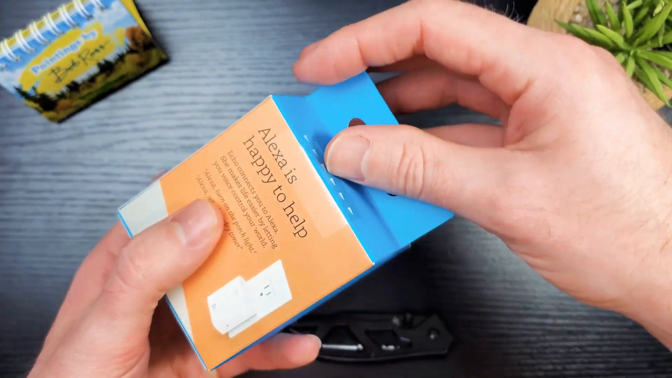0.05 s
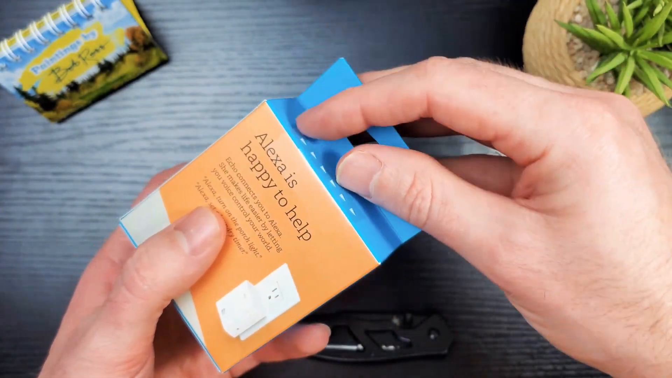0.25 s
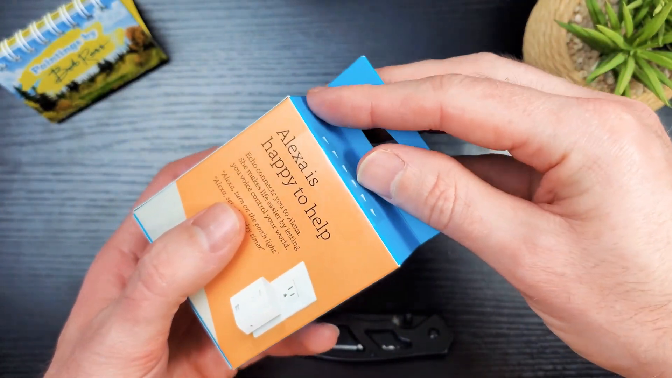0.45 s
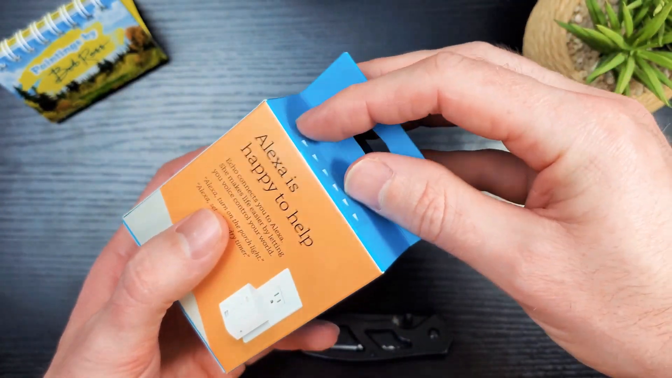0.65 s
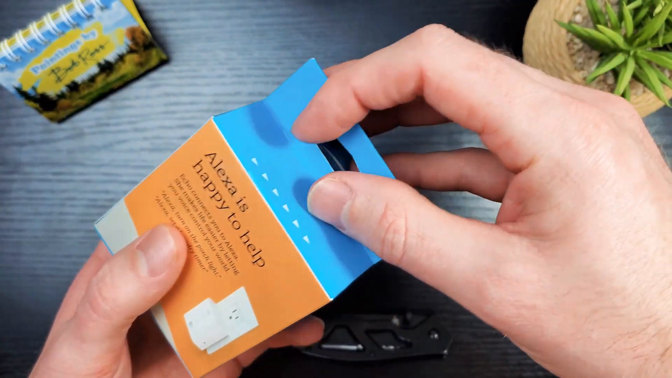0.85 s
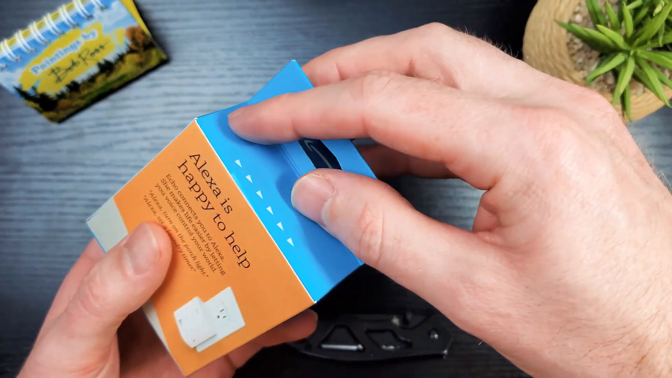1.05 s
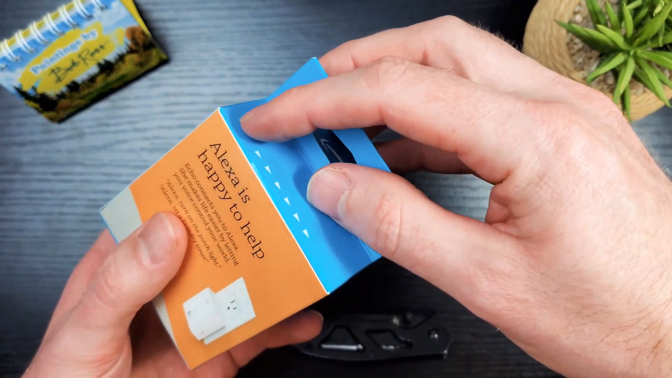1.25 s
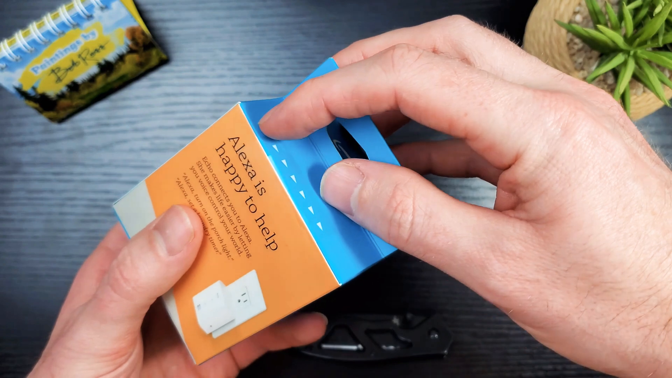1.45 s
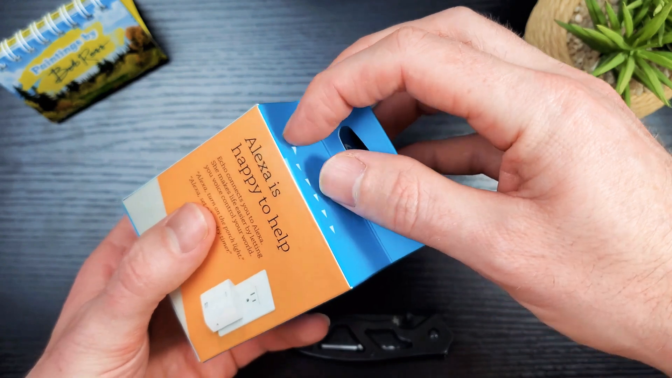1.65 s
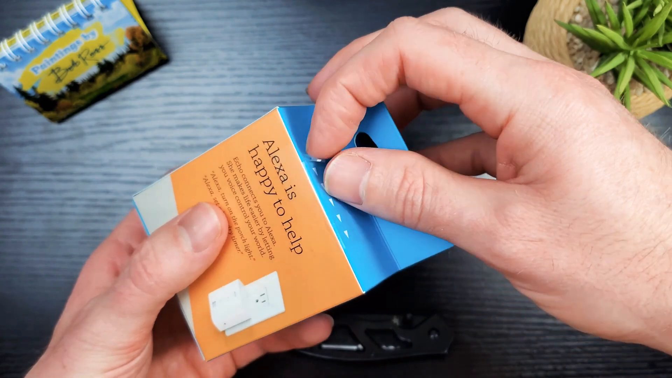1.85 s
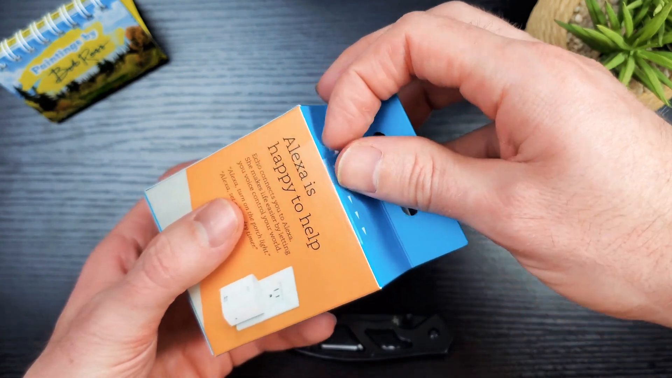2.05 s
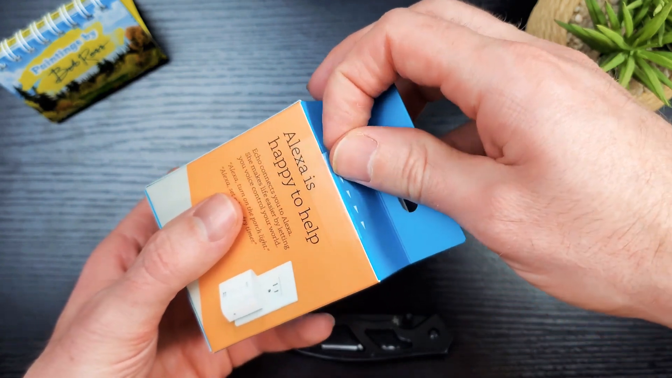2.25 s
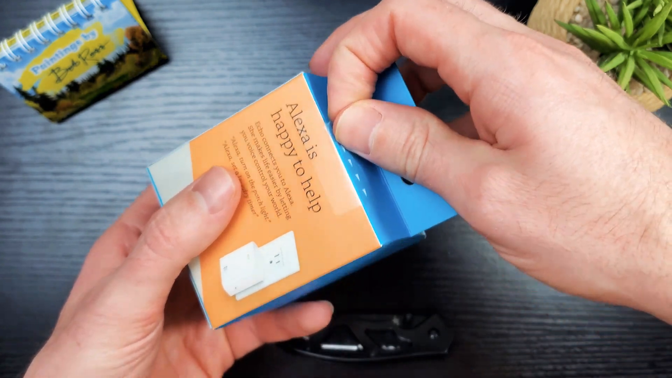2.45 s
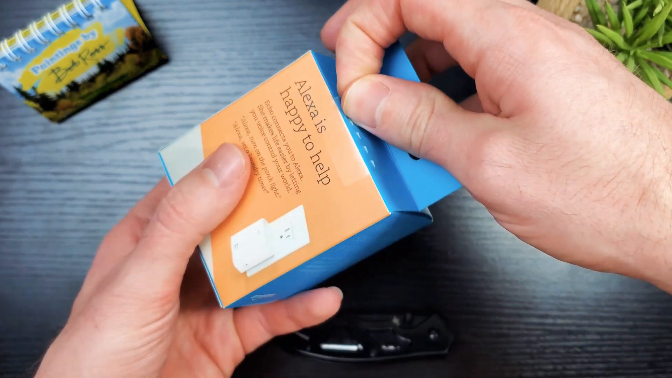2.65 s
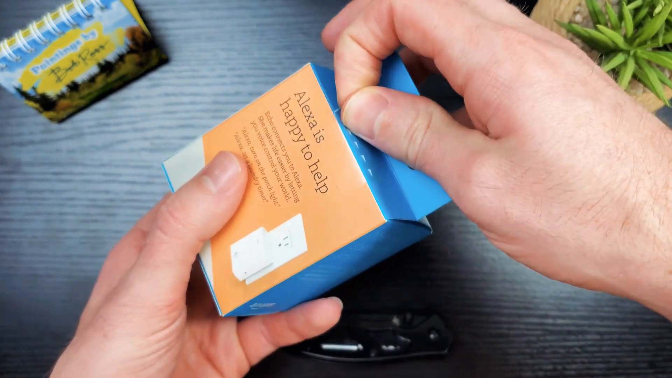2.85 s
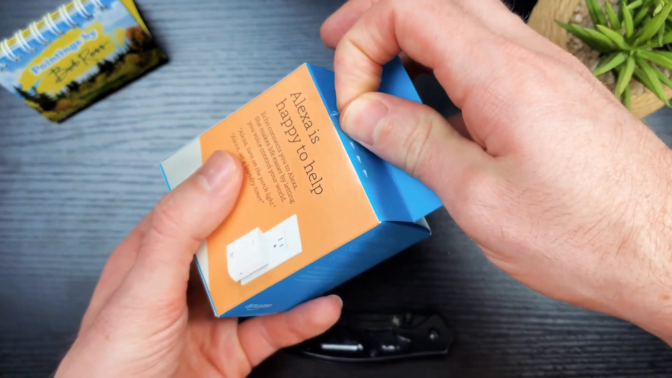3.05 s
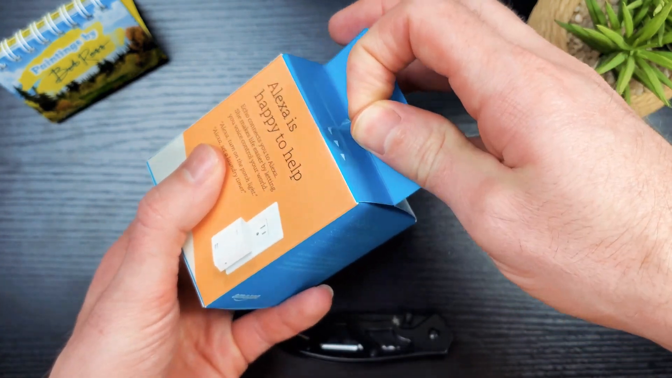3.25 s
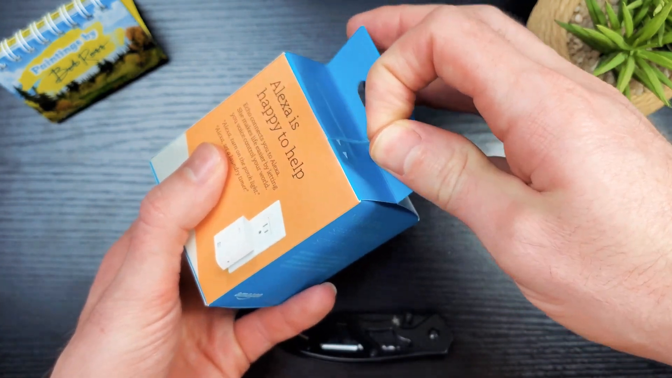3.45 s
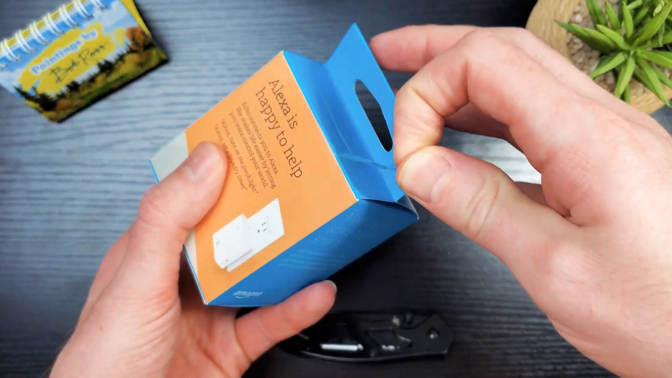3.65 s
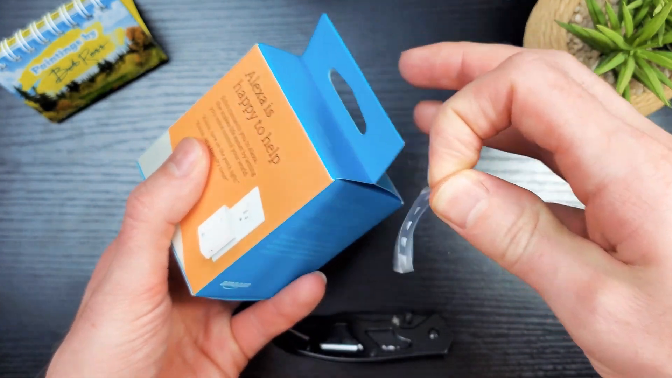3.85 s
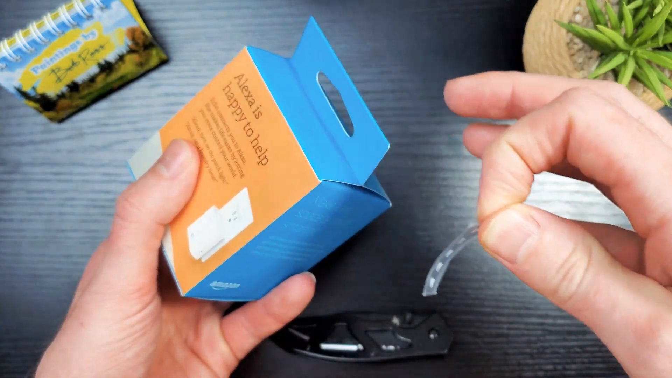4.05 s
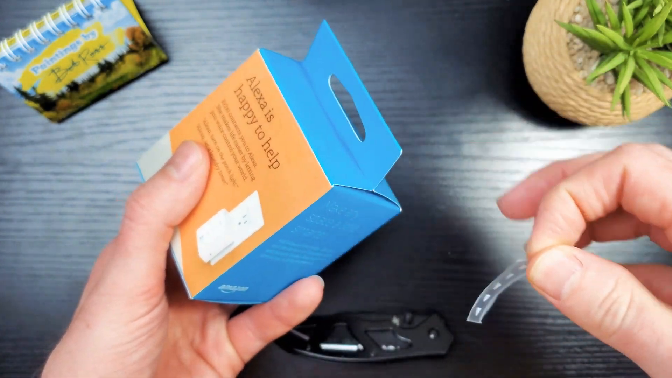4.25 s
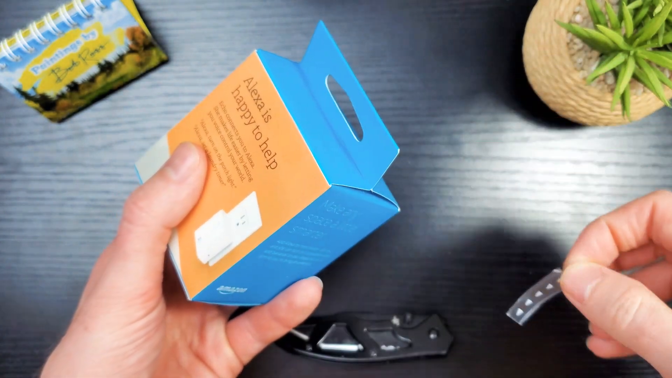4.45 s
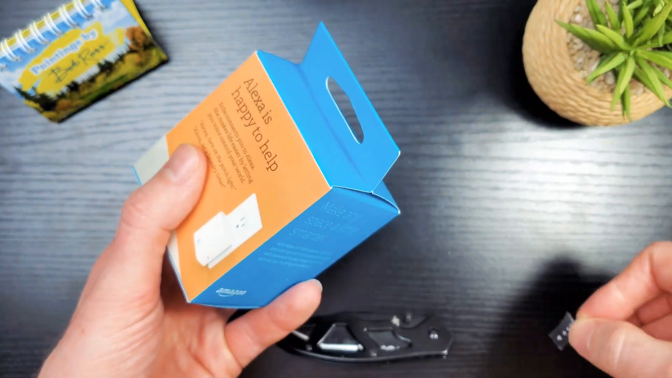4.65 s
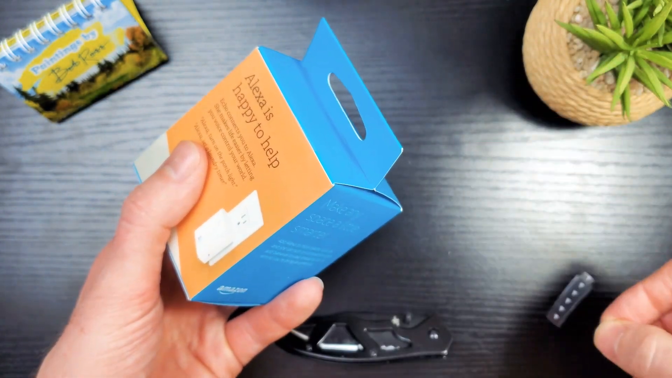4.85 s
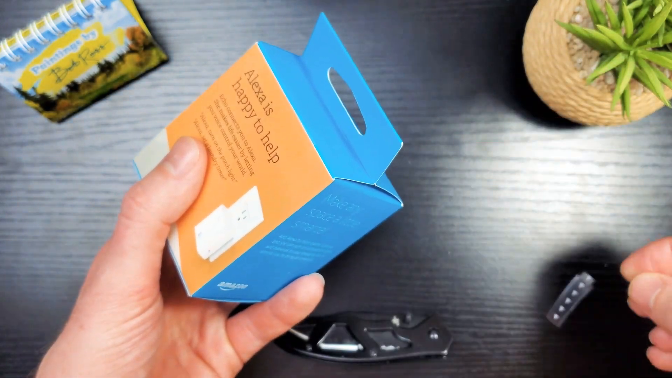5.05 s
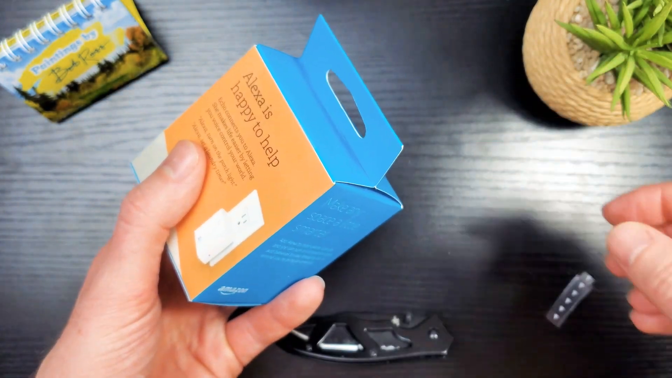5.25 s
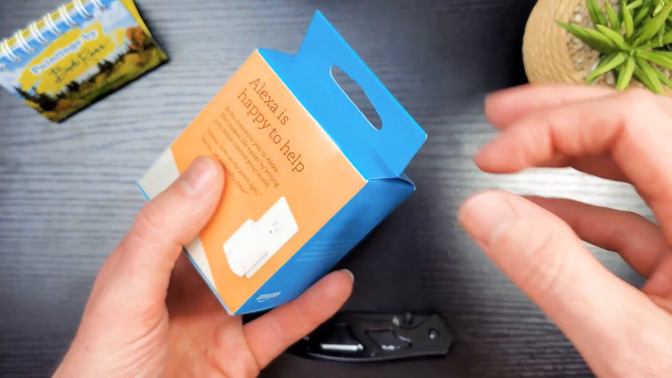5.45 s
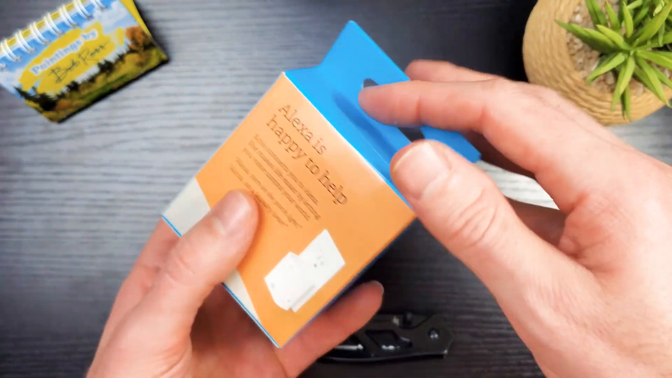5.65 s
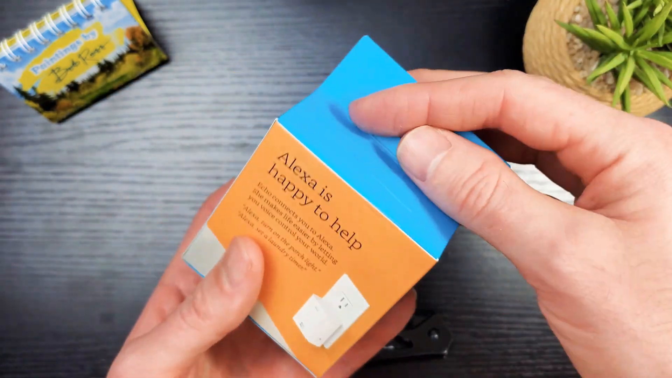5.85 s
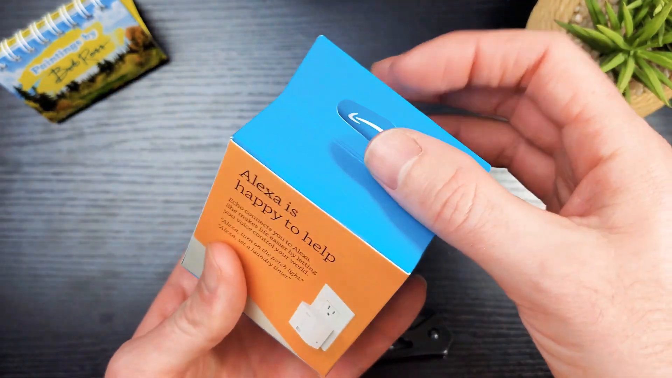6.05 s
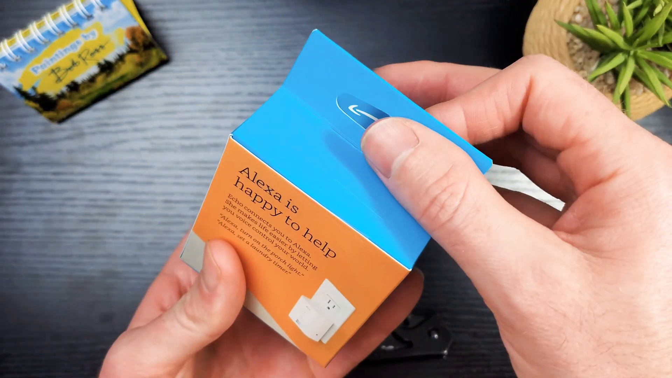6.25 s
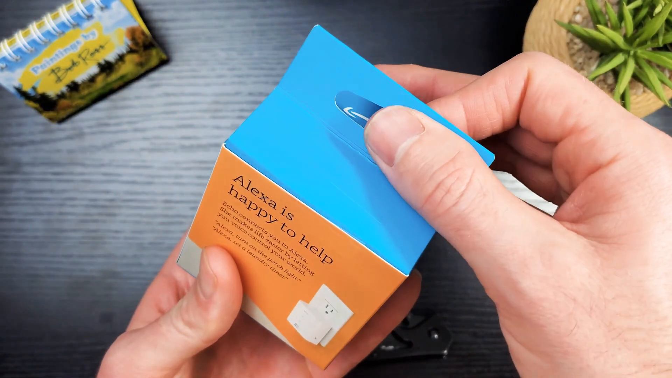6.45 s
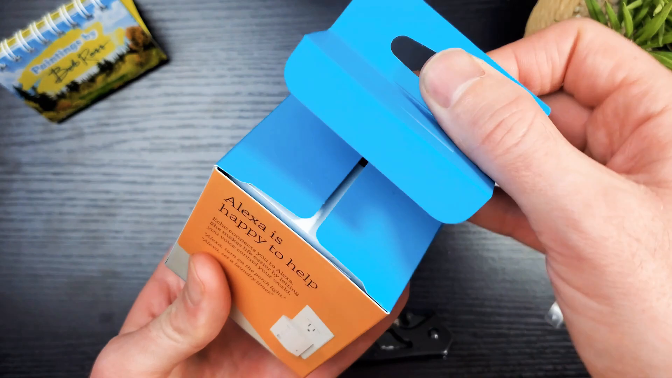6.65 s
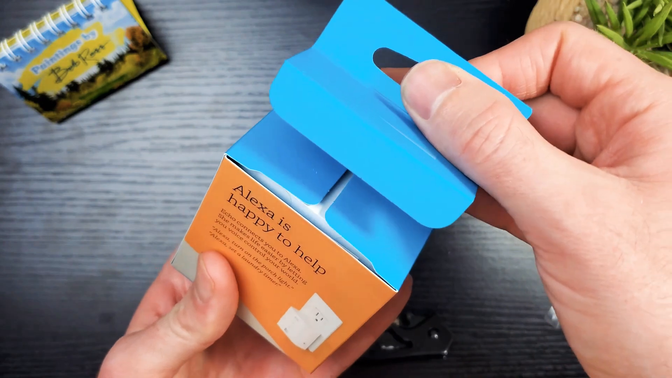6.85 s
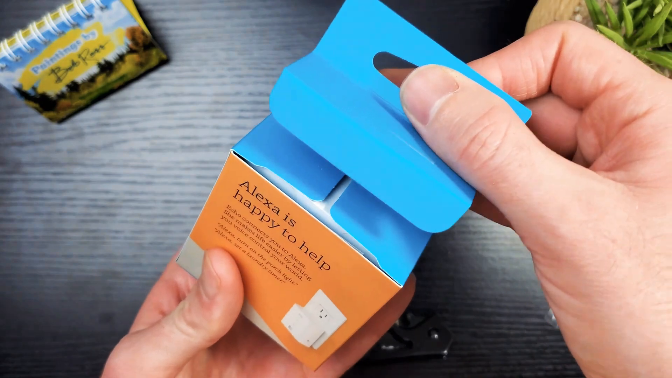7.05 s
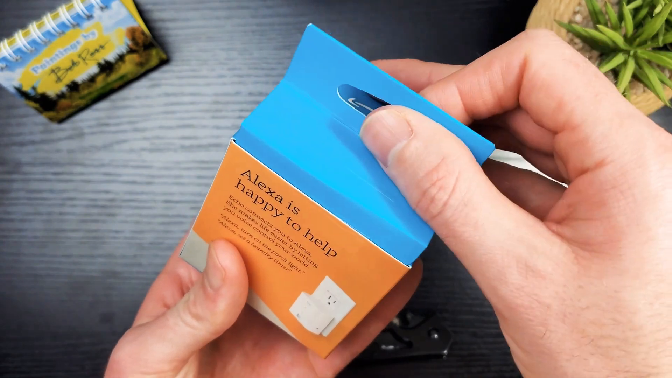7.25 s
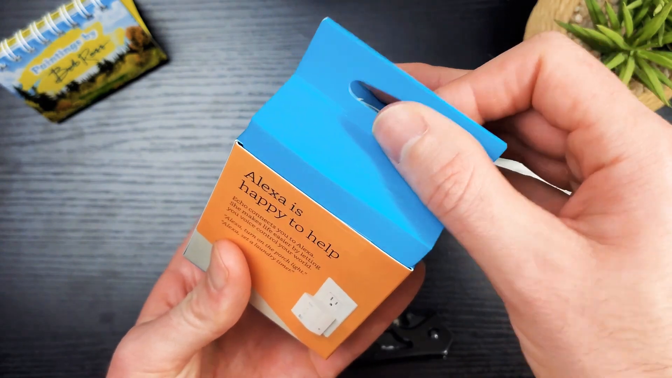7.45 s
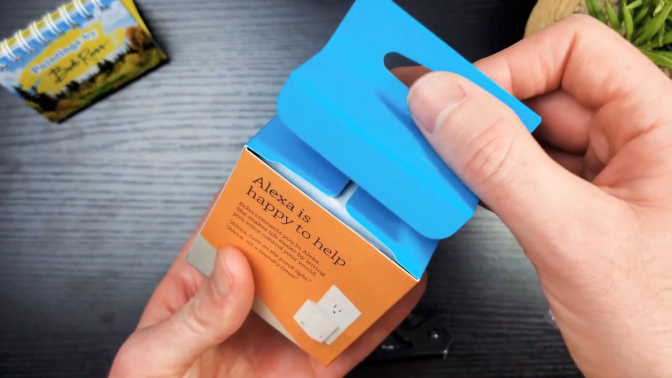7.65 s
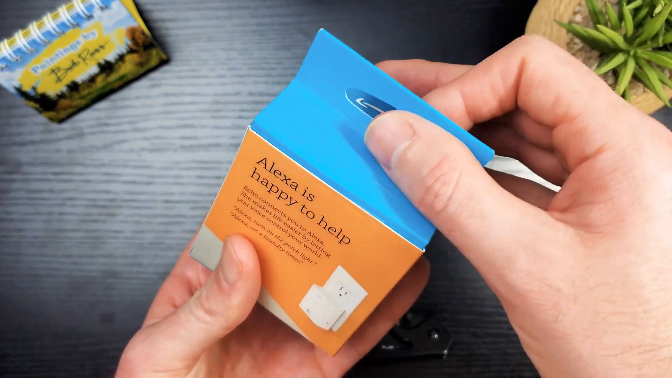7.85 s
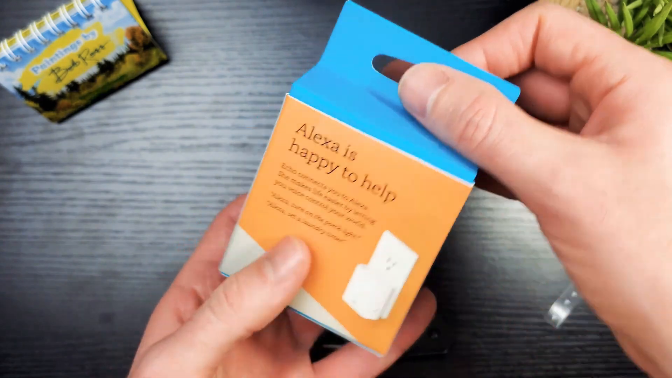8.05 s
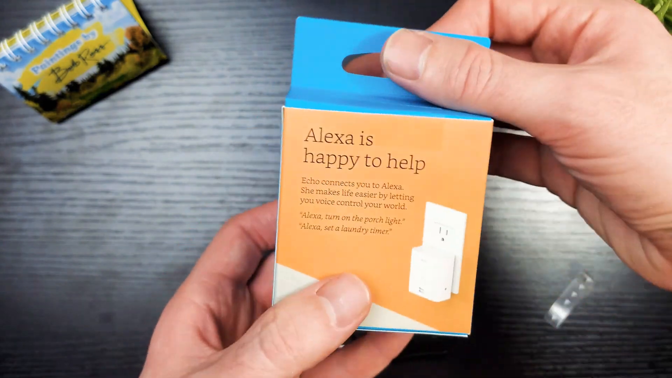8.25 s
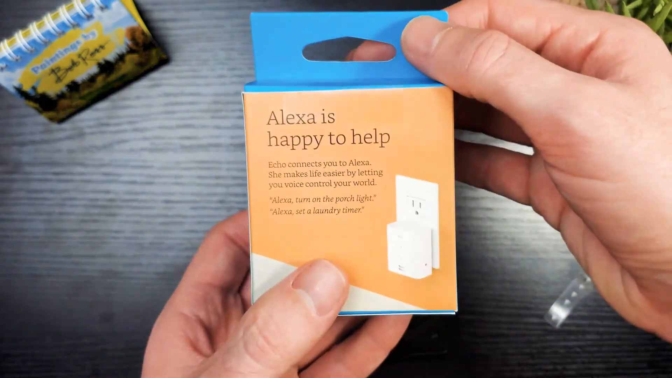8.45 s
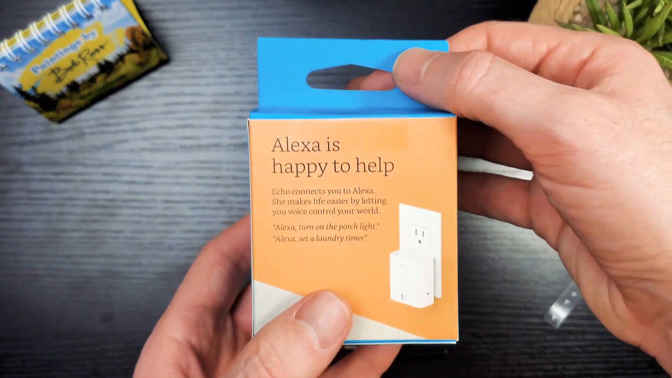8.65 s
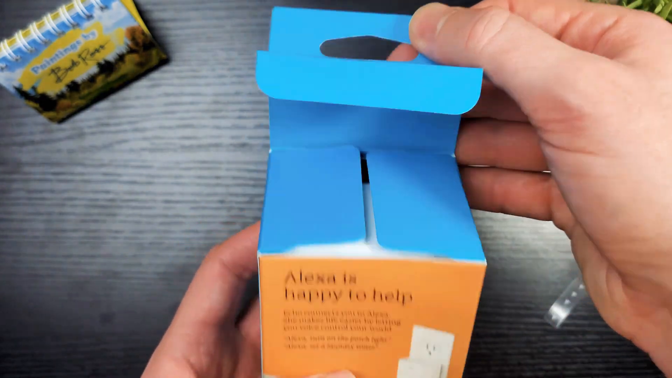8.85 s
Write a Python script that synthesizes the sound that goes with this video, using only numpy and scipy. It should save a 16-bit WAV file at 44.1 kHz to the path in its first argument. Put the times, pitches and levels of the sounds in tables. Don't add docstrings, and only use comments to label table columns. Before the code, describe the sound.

Close, dry cardboard handling on a desk: fingertip slips, nail picks and card-edge scrapes over low rumble and faint hum. A strip of tape comes away with tiny crisp ticks and is set aside with a small click. After a quiet pause come hollow bumps and a loud flap pop, then shorter thumping scrapes, and finally the loudest crackling crunch of bending card. Only a short dull room tail follows each hit.

```python
import sys
import numpy as np
from scipy import signal
from scipy.fft import rfft, irfft
from scipy.io import wavfile
from scipy.ndimage import uniform_filter1d

SR = 44100
rng = np.random.default_rng(int(sys.argv[2]) if len(sys.argv) > 2 else 0)


def materialize(psi):
    bounded = np.clip(np.atleast_2d(psi).T, -1, 1)
    quanta = np.round(bounded * 32767).astype(np.int16)
    wavfile.write(sys.argv[1], SR, quanta)


def voltage_ratio(decibels):
    exponent = np.asarray(decibels, float) / 20
    return 10 ** exponent


N = 392931


def evened(x):
    return x / np.sqrt(np.mean(x ** 2) + 1e-20)


def add(mix, start_s, sound):
    part = mix[..., round(start_s * SR):][..., :sound.shape[-1]]
    part += sound[..., :part.shape[-1]]


def curve(rows):
    time_s, *columns = np.transpose(rows)
    return np.array([np.interp(np.arange(N) / SR, time_s, column) for column in columns])


def wander(size):
    steps = evened(uniform_filter1d(rng.standard_normal(N // 64 + 2), size=size))
    return np.interp(np.arange(N) / 64, np.arange(len(steps)), steps)


def noise(spectrum):
    freq_hz, level_db = np.transpose(spectrum)
    bin_hz = np.fft.rfftfreq(N + 1, 1 / SR)
    shape = voltage_ratio(np.interp(np.log(bin_hz + 1), np.log(freq_hz), level_db))
    return evened(irfft(rfft(rng.standard_normal(N + 1)) * shape)[:N])


def ring(freq_hz, width_hz, size=1500):
    t = np.arange(size) / SR
    tap = t * np.exp(-1.5 * np.pi * width_hz * t) * np.cos(2 * np.pi * freq_hz * t)
    return tap / np.linalg.norm(tap)


# time_s, level_db
RUMBLE = [(0.0, -51.5), (0.5, -55), (1.61, -58.5), (1.81, -47.5), (2.36, -55.5), (2.98, -51.5), (3.45, -60),
          (3.82, -61), (5.09, -64.5), (6.03, -47.5), (6.25, -57), (6.6, -44), (6.95, -62.5), (8.41, -51),
          (8.56, -51), (8.79, -55), (8.91, -58)]
# freq_hz, level_db
RUMBLE_SPECTRUM = [(18, -34.5), (40, -9.5), (62, -0.5), (85, -10.5), (120, -23), (300, -82.5)]
DRONE_SPECTRUM = [(60, -34), (95, 0.5), (125, -0.5), (160, -8.5), (260, -14), (330, -16), (450, -27.5),
                  (900, -64.5)]
HISS_SPECTRUM = [(250, -27.5), (520, 1.5), (940, -5), (1300, -3), (2060, -10.5), (3710, -6), (14700, -13),
                 (16500, -11.5)]
# freq_hz, width_hz, level_db
HUM = [
    (119, 7, -62),
    (957, 8, -84),
]


def room_tone():
    rumble_db = curve(RUMBLE)[0]
    rumble = voltage_ratio(rumble_db) * evened(voltage_ratio(0.77 * wander(size=60)) * noise(RUMBLE_SPECTRUM))
    drone_db = -57 + 0.27 * (rumble_db + 57.5) + 1.1 * wander(size=80)
    drone = voltage_ratio(drone_db) * noise(DRONE_SPECTRUM)
    hum = np.zeros(N)
    for freq_hz, width_hz, level_db in HUM:
        tone = signal.oaconvolve(rng.standard_normal(N), ring(freq_hz, width_hz, size=SR // 2))[:N]
        hum += voltage_ratio(level_db) * evened(tone)
    return rumble + drone + hum + voltage_ratio(-66) * noise(HISS_SPECTRUM)


def room(x, t60_s=0.23, dull_hz=3500):
    t = np.arange(SR // 3) / SR
    tail = rng.standard_normal(len(t)) * voltage_ratio(-60 * t / t60_s) * (t > 0.003)
    tail = signal.lfilter(*signal.butter(1, dull_hz, fs=SR), tail)
    return signal.oaconvolve(x, tail / np.linalg.norm(tail))[:N]


# start_s, peak_db, pitch_hz, t60_s
THUMPS = [(0.745, -30.5, 303, 0.063), (0.751, -30, 136, 0.092), (0.784, -32, 307, 0.03),
          (0.893, -40.5, 317, 0.049), (3.13, -32, 164, 0.055), (3.331, -38, 65.5, 0.23),
          (3.831, -30, 208, 0.066), (4.043, -44.5, 308, 0.031), (5.688, -37, 170, 0.065),
          (5.763, -30, 111, 0.079), (5.936, -23.5, 266, 0.038), (6.031, -23, 168, 0.03),
          (6.118, -26, 336, 0.025), (6.156, -27, 200, 0.029), (6.17, -20, 105, 0.067),
          (6.221, -24.5, 490, 0.027), (6.558, -23, 96.6, 0.066), (6.629, -8, 103, 0.048),
          (6.654, -12.5, 72.8, 0.11), (7.222, -17.5, 115, 0.086), (7.509, -28.5, 109, 0.086),
          (7.803, -22.5, 122, 0.13), (8.117, -27.5, 131, 0.042), (8.292, -24, 70, 0.098),
          (8.49, -29.5, 122, 0.057), (8.807, -9.5, 118, 0.045), (8.877, -9, 67, 0.17)]


def thumps():
    out, t = np.zeros(N), np.arange(SR // 5) / SR
    for start_s, peak_db, pitch_hz, t60_s in THUMPS:
        band = signal.butter(2, [pitch_hz, 3 * pitch_hz], "band", fs=SR)
        rattle = evened(signal.lfilter(*band, rng.standard_normal(len(t))))
        swing = np.sin(2 * np.pi * pitch_hz * t) + 0.5 * rattle * np.exp(-t / 0.021)
        onset = 1 - np.exp(-t * pitch_hz * 3)
        add(out, start_s, voltage_ratio(peak_db - 60 * t / max(t60_s, 0.02)) * onset * swing)
    return out


# time_s, level_db
GRIP = [
    [(0.0, -64), (3.02, -74), (3.39, -62), (3.95, -70)],
    [(5.3, -80.5), (6.71, -54.5), (6.92, -84.5), (8.91, -54)],
]


def grip_power():
    power = np.zeros((3, N))
    for rows in GRIP:
        a, b = round(rows[0][0] * SR), round(rows[-1][0] * SR)
        level_db = curve(rows)[:, a:b] + [[0], [12.5], [-2]]
        power[:, a:b] += voltage_ratio(level_db) ** 2 * signal.windows.tukey(b - a, 0.05)
    return power


# start_s, length_s, level_db, swell_db (rise over the slip)
SKIN = [(.057, 0.042, -61.5, -21), (.154, 0.082, -59, -5), (.485, 0.032, -70, -15), (.524, 0.19, -57.5, -4),
        (2.041, 0.017, -55, 17), (3.322, 0.019, -48, 12), (5.817, 0.11, -50.5, 1.5),
        (5.935, 0.1, -46.5, -13), (6.015, 0.13, -52.5, -25.5), (6.154, 0.054, -45.5, 7),
        (6.217, 0.081, -55.5, -50), (7.88, 0.2, -57, -9), (8.03, 0.12, -47, 22), (8.145, 0.13, -48, -12),
        (8.322, 0.1, -46.5, 3), (8.411, 0.23, -53, -22), (8.872, .035, -38.5, -6)]
PAD = [(0.0, 0.078, -66, -30), (.105, .066, -58, -3), (.25, 0.025, -60.5, -21), (.696, .012, -60, 0),
       (.722, 0.025, -48, 4), (.868, 0.0071, -55, 0), (3.418, 0.005, -58, -3), (3.457, .008, -68, 0),
       (3.531, 0.0073, -58, 0), (3.6, 0.011, -61, 2), (.822, 0.21, -65.5, -14), (1.997, 0.069, -58, -15),
       (2.068, 0.091, -61, 4), (2.207, 0.065, -60.5, 27), (2.274, 0.033, -61.5, 6), (3.144, 0.1, -52.5, 15),
       (3.475, 0.11, -58, 7.5), (3.583, 0.14, -72, -11), (3.707, 0.16, -71, 14), (5.693, 0.073, -58.5, 22),
       (5.94, 0.01, -43, -4), (6.556, 0.024, -44, -12), (6.594, 0.011, -52, 0), (6.576, .045, -55, -8),
       (8.818, 0.018, -43, -13)]
NAIL = [(.151, 0.0052, -47, 12), (.315, 0.0061, -55.5, 0), (.478, 0.0053, -57, -2),
        (.992, 0.11, -61.5, -12), (1.104, 0.16, -61, -9), (1.315, 0.038, -57.5, 3), (1.388, 0.023, -59, 6),
        (1.455, 0.05, -60, -29), (1.514, 0.067, -63, 34.5), (1.59, 0.048, -62, -10),
        (1.746, 0.025, -51.5, 14), (1.862, 0.061, -54, 13), (1.922, 0.082, -53.5, -17.5),
        (2.416, 0.15, -65, -18), (2.574, 0.072, -72, -22), (3.347, 0.05, -65, -28), (5.419, 0.24, -70, -7),
        (6.39, 0.027, -44.5, -11), (6.786, 0.0048, -50, 1), (6.5, 0.036, -50, -19.5),
        (6.83, .011, -67, -12), (6.878, 0.03, -57.5, 18), (6.999, 0.017, -64, -18),
        (7.113, 0.023, -60.5, 14.5), (7.137, 0.089, -67.5, 31), (7.493, 0.015, -58, 12),
        (7.707, 0.031, -56, -14), (7.771, 0.014, -58.5, -12)]
EDGE = [(.642, 0.096, -54.5, -16), (.737, 0.098, -59, -13), (1.642, 0.11, -54.5, -32.5),
        (1.779, 0.078, -45.5, -15.5), (2.396, 0.032, -51.5, 10), (3.108, 0.033, -53.5, 44),
        (3.241, 0.075, -55, -14), (3.811, 0.031, -48, 15), (4.788, 0.023, -57, 15),
        (4.804, 0.12, -67.5, -29), (6.801, 0.0044, -27, -5), (6.8195, 0.0044, -29, -4),
        (6.866, 0.0025, -37, -9), (6.903, 0.004, -65, 4), (8.262, 0.043, -47, 6.5),
        (8.646, 0.067, -48.5, -8), (8.771, 0.03, -41, 7)]
PEEL = [
    (3.828, 0.056, -56.5, 5),
    (5.081, .035, -79, -2),
    (5.758, 0.032, -53, -23),
]
# start_s, length_s, level_db, swell_db, extra_panel_db
FOLD = [(7.288, 0.034, -51, -24.5, 4.5), (8.487, 0.021, -47.5, -2.5, 3.5), (8.61, 0.042, -57, 9, 3),
        (8.795, 0.019, -25, -4, 4.5), (8.804, .007, -17, 2, -4), (8.812, 0.0085, -16, 1, -6.5),
        (8.836, 0.0041, -17, -3, -4), (8.843, 0.017, -16, -11, -0.5), (8.858, 0.008, -9.5, 2, -7.5),
        (8.865, 0.0048, -7.5, -1, -10.5)]
# start_s, length_s, level_db, swell_db, extra_panel_db
FLAP = [(6.626, 0.0086, -17, -3, -4.5), (6.633, 0.011, -18.5, 2, -11), (6.641, 0.011, -15, 3, -4),
        (6.653, 0.13, -44, -32, 0.5), (7.207, 0.011, -32, -2, 0), (7.217, 0.0054, -20.5, 6, -4),
        (7.227, 0.014, -25, -3, -6.5), (7.241, 0.027, -35, -11, -2), (7.271, 0.0063, -35, -2, -5),
        (7.283, 0.0035, -36.5, -5, 0.5), (7.29, 0.0046, -41, 0, -7), (7.341, 0.005, -38, -8, -1.5),
        (7.507, 0.0053, -26, -11, -10), (7.517, 0.014, -24.5, 10, -8), (7.529, 0.0098, -21.5, -9, -3.5),
        (7.539, 0.026, -46.5, -8, 5.5), (7.799, .011, -32, -11, -1.5), (7.811, 0.0094, -25, -4, 0.5),
        (7.82, 0.037, -29, -4, -9.5), (7.85, 0.04, -33.5, -9, -4), (7.882, 0.016, -43, 1, 6),
        (8.116, 0.019, -41, 3, 3), (8.13, 0.025, -29.5, -3, -1.5), (8.292, 0.033, -38.5, -4, 1)]


def slip_power():
    power = np.zeros((3, N))
    contacts = [(SKIN, 5.5, 2.5), (PAD, 12.6, 1.9), (NAIL, 12.74, -4), (EDGE, 6.6, -2.5),
                (FOLD, 4, -10), (PEEL, -13, 9.3), (FLAP, 7.9, -2)]
    for rows, panel_db, fizz_db in contacts:
        for start_s, length_s, level_db, swell_db, *extra_panel_db in rows:
            u = np.linspace(-0.5, 0.5, max(round(length_s * SR), 2))
            arch_db = 1 - 14 * u ** 2
            share_db = np.array([[0], [panel_db + sum(extra_panel_db)], [fizz_db]])
            add(power, start_s, voltage_ratio(level_db + swell_db * u + arch_db + share_db) ** 2)
    return power


def pressure():
    power = uniform_filter1d(grip_power() + slip_power(), size=70)
    keep = np.exp(-1 / (0.0012 * SR))
    return np.sqrt(signal.lfilter([1 - keep], [1, -keep], abs(power)))


def grit(per_s, spread_db, smooth):
    size = voltage_ratio(spread_db * np.minimum(rng.exponential(1, N), 4)) * (rng.random(N) < per_s / SR)
    clump = voltage_ratio(1.04 * evened(uniform_filter1d(rng.standard_normal(N), size=180)))
    clicks = evened(size * rng.standard_normal(N))
    return evened(clump * (clicks + smooth * rng.standard_normal(N)))


def rubbing():
    push = pressure()
    hard = np.clip(1 + np.log10(push[0] + 1e-9) / 3, 0, 1)
    stutter_db = (hard + 0.4) * 1.8 * wander(size=3)
    return push * grit(per_s=2300, spread_db=2.2, smooth=1.3) * voltage_ratio(stutter_db)


# start_s, level_db, panel_db, panel_hz
KNOCKS = [(0.1574, -38.5, 9.5, 1530), (0.1605, -44, 16, 1570), (.32, -42, 6, 1370), (0.704, -51, 15, 1140),
          (.786, -45.5, 2, 1490), (.9804, -44, -3, 1350), (1.6918, -34.5, 1, 1560),
          (3.2142, -37.5, -12, 880), (5.429, -46.5, 3, 1090), (5.762, -24.5, 0.5, 1240),
          (5.8932, -37, -2, 1430), (6.032, -36.5, 11, 1180), (6.1189, -25.5, 4, 960),
          (6.643, -14.5, -5.5, 954), (7.2085, -18.5, -4, 653), (7.5415, -32, -3, 1500),
          (7.77, -42.5, -6, 1450), (8.8166, -20.5, 10.5, 1180), (8.837, -17, 7.5, 1260),
          (8.8592, -8, -2, 1540), (8.8758, -21.5, 4.5, 1050)]
# start_s, level_db, panel_db, panel_hz
SNAPS = [(0.4807, -53.5, 24, 1410), (0.75, -46, 16.5, 1110), (2.053, -30, -0.5, 1870),
         (2.267, -30.5, 6.5, 990), (2.58, -45, 7.5, 1460), (3.3319, -36.5, -4, 1340),
         (3.337, -47.5, 16, 1460), (3.3492, -49.5, 12, 1390), (3.811, -41.5, 7, 960),
         (3.8308, -27.5, 8.5, 990), (5.6926, -34, -2, 1530), (6.1708, -29, 2.5, 1070),
         (6.221, -25, 6.5, 1364), (6.2982, -42.5, 13.5, 576), (6.627, -11, 1, 1240),
         (6.6767, -33.5, 11.5, 1710), (6.804, -22, 2, 1440), (6.819, -19.5, -6.5, 1090),
         (6.8667, -24.5, -6, 1160), (6.8417, -25, -5.5, 1110), (6.8923, -37.5, -0.5, 1190),
         (7.3332, -50, 4, 1430), (6.5775, -38, 9, 1300), (7.5095, -28, -19, 1145),
         (8.2906, -32, -0.5, 1250), (8.804, -14.5, 1.5, 1400)]
# start_s, level_db
TAPE = [(1.9649, -29.5), (1.983, -49), (2.2521, -43), (2.373, -51), (2.553, -58), (2.843, -49),
        (2.876, -48.5), (2.896, -52), (2.9263, -51), (2.947, -45), (3.02, -53), (3.054, -47.5),
        (3.822, -31.5), (4.786, -51), (4.804, -23), (5.495, -42.5)]
# start_s, level_db
GLUE = [(2.794, -76), (3.0328, -57.5), (3.35, -61), (3.42, -64), (3.1126, -62), (3.713, -71), (3.7176, -64),
        (3.751, -66), (3.786, -69), (3.815, -51), (3.827, -37.5), (3.837, -45)]


def ticks():
    drive, knock, t = np.zeros((3, N)), np.zeros(N), np.arange(600) / SR
    click_s = t[130]
    rows = [(*row, -14) for row in KNOCKS] + [(*row, -0.5) for row in SNAPS]
    rows += [(*row, -18, 1040, 0.5) for row in TAPE]
    rows += [(*row, -18, 1040, 16.5) for row in GLUE]
    for start_s, level_db, panel_db, panel_hz, fizz_db in rows:
        z = rng.standard_normal(len(t))
        sign = np.sign(z[0])
        splinters = 0.5 * z * np.exp(-abs(t - click_s) / 0.001) * np.where(t < click_s, 0.4, 1)
        crack = splinters + sign * (t == click_s)
        share_db = np.array([[0], [panel_db + 8.0], [fizz_db]])
        add(drive, start_s - click_s, voltage_ratio(level_db + 16.5 + share_db) * crack / np.linalg.norm(crack))
        decay = voltage_ratio(level_db + panel_db + 3 - 60 * t / 0.016)
        add(knock, start_s, decay * np.tanh(t * panel_hz) * np.sin(2 * np.pi * panel_hz * t) * sign)
    return drive, knock


# freq_hz, width_hz, level_db
FACE = [(2503, 730, 5.5), (3210, 500, 1), (4255, 900, 6.5), (4960, 1320, 6), (6070, 960, -1.5)]
PANEL = [(299.5, 160, 1.5), (695, 170, -2), (862, 118, -0.5), (900, 187, 2), (1090, 310, -4),
         (1222, 133, -7), (1430, 210, -1.5), (1904, 510, 2)]
FIZZ = [(7674, 1680, 1.5), (9040, 1970, 2.5), (10600, 2700, -2), (14060, 2300, 4)]
# time_s, free_panel_hz, tilt_db_per_octave, free_face_hz
TONE = [(0, 1180, -10, 4300), (.75, 1165, -5, 3930), (1.5, 1120, -13, 4550), (1.9, 1134, -10, 4200),
        (2.9, 1090, 2.5, 4400), (3.2, 970, -9, 4400), (3.55, 910, -6, 4460), (3.85, 910, 0, 4350),
        (4.8, 1340, -27, 5150), (5.42, 970, 0, 4400), (5.7, 1120, -3, 5200), (5.95, 1040, -3, 4320),
        (6.25, 1190, -6, 4730), (6.9, 1075, -4.5, 4500), (7.23, 1120, -4, 4040), (7.6, 1275, -11, 4180),
        (8.15, 1043, -11, 5100), (8.91, 1200, -7, 3670)]


def card():
    clicks, out = ticks()
    panel_hz, tilt_db, face_hz = curve(TONE)

    def face_held_db(freq_hz):
        return -np.minimum(9 * np.log2(freq_hz / face_hz) ** 2, 8)

    def panel_held_db(freq_hz):
        return -np.minimum(25 * np.log2(freq_hz / panel_hz) ** 2, 12)

    def fizz_tilt_db(freq_hz):
        return tilt_db * np.log2(freq_hz / 10000)

    parts = [(FACE, face_held_db), (PANEL, panel_held_db), (FIZZ, fizz_tilt_db)]
    for rub, click, (modes, held_db) in zip(rubbing(), clicks, parts):
        total = np.linalg.norm(voltage_ratio([level_db for *_, level_db in modes]))
        for k, (freq_hz, width_hz, level_db) in enumerate(modes):
            feed = (rub * voltage_ratio(2.78 * wander(size=22)) + click) * voltage_ratio(held_db(freq_hz))
            tone = signal.oaconvolve(feed, ring(freq_hz, width_hz))[:N]
            out += (-1) ** k * voltage_ratio(level_db) / total * tone
    return out


def scene():
    box = card()
    return (box + voltage_ratio(-19.5) * room(box) + thumps() + room_tone())[None]


def roll_off(x):
    return signal.sosfilt(signal.butter(12, 16850, fs=SR, output="sos"), x)


def record(dry):
    over = np.maximum(abs(dry) - 0.55, 0)
    mic = dry - np.sign(dry) * (over - 0.28 * np.tanh(over / 0.28))
    mic = signal.oaconvolve(mic, signal.firwin(201, 15650, fs=SR)[None], "same")
    return roll_off(mic)


dry = scene()
out = record(dry)
materialize(out)
```